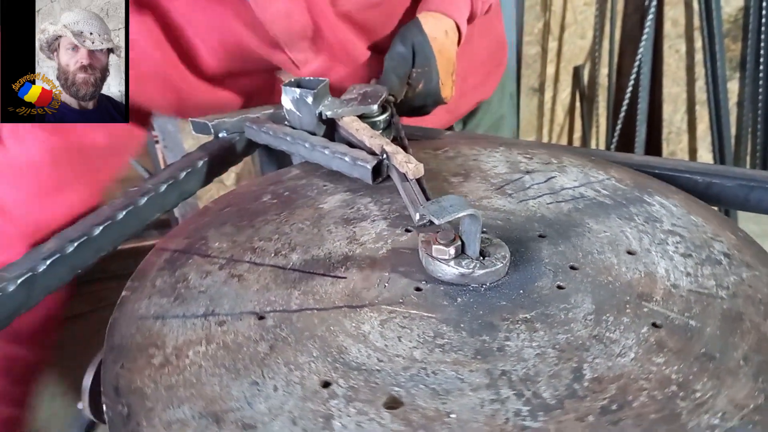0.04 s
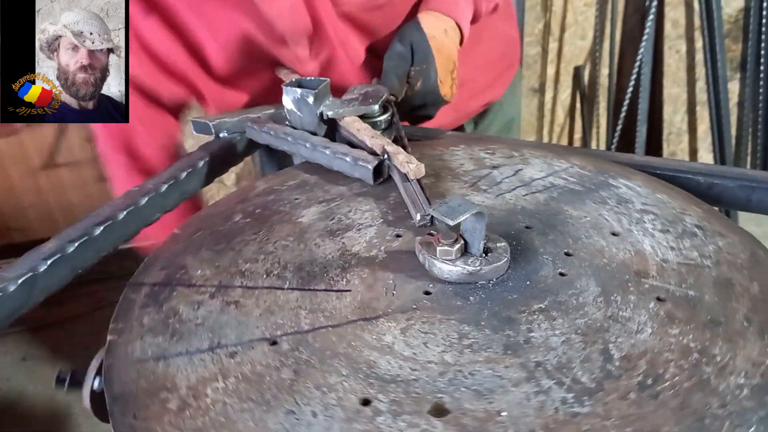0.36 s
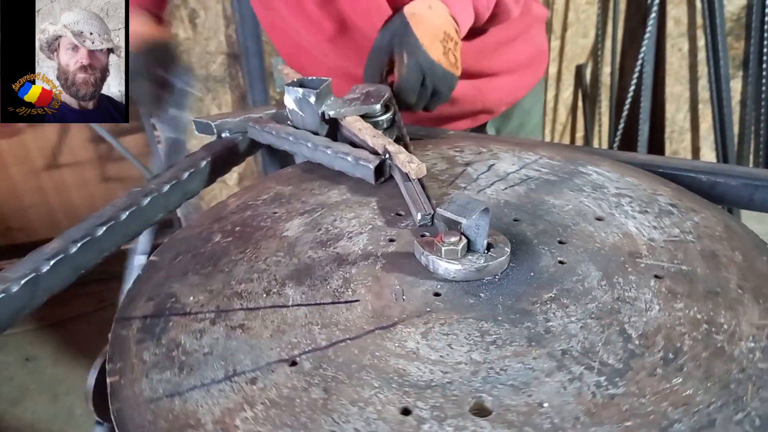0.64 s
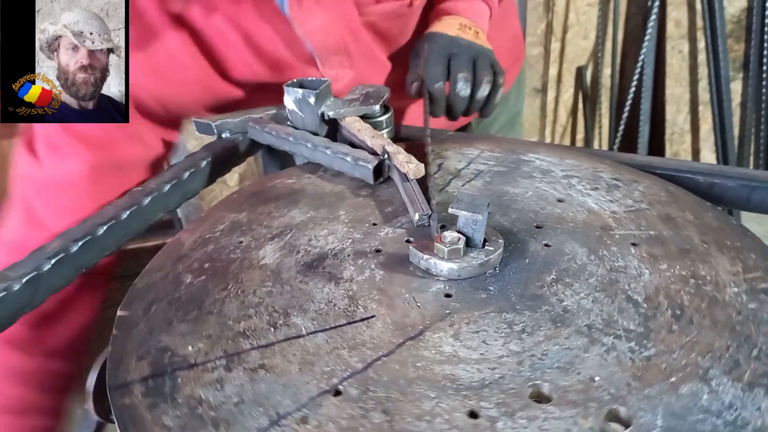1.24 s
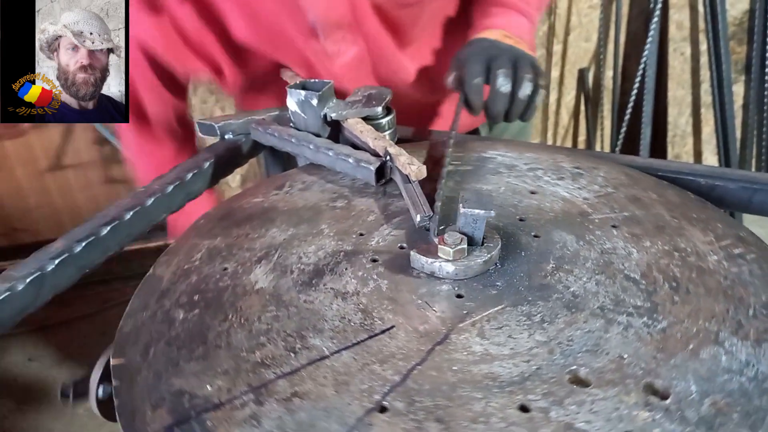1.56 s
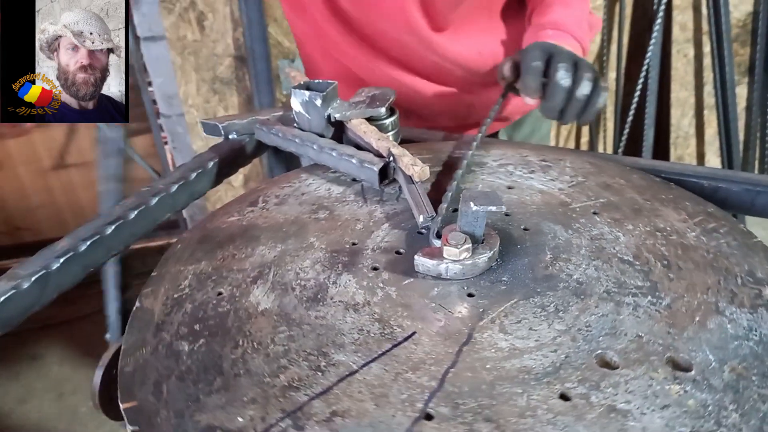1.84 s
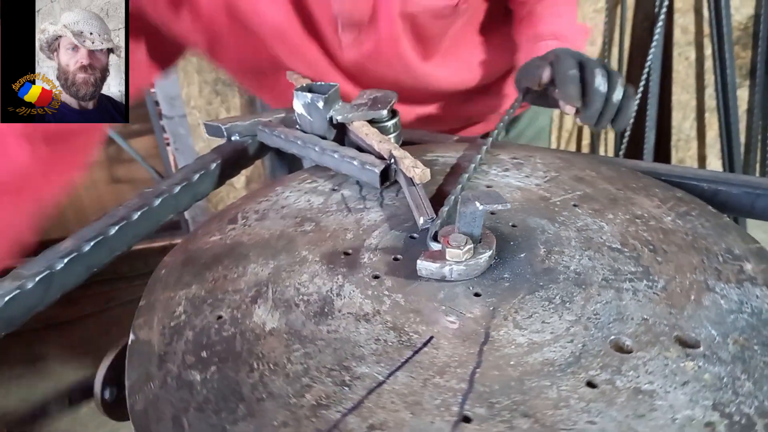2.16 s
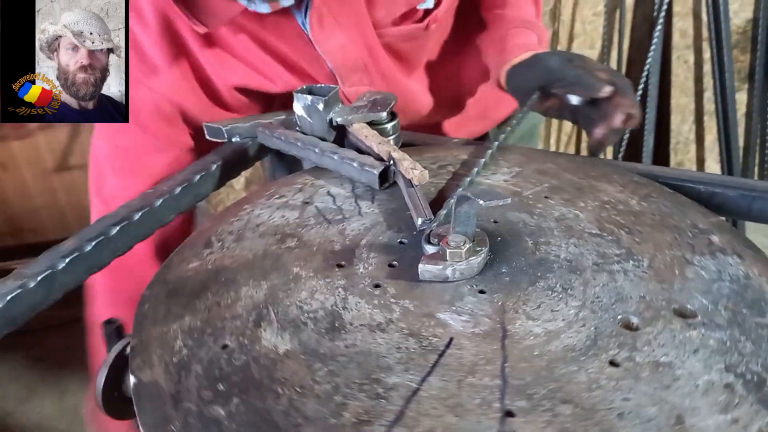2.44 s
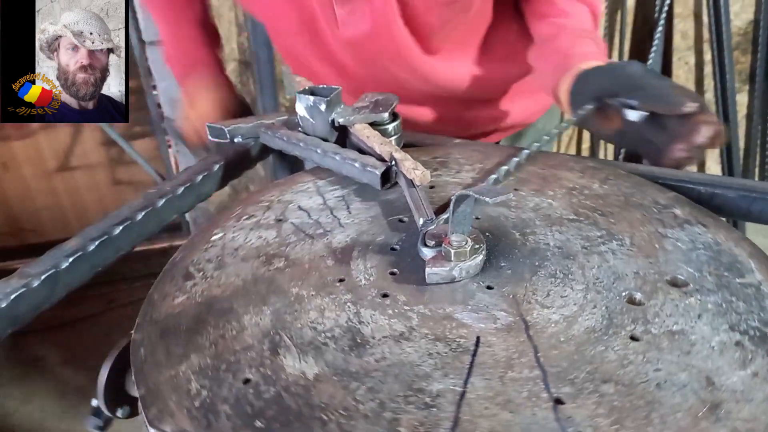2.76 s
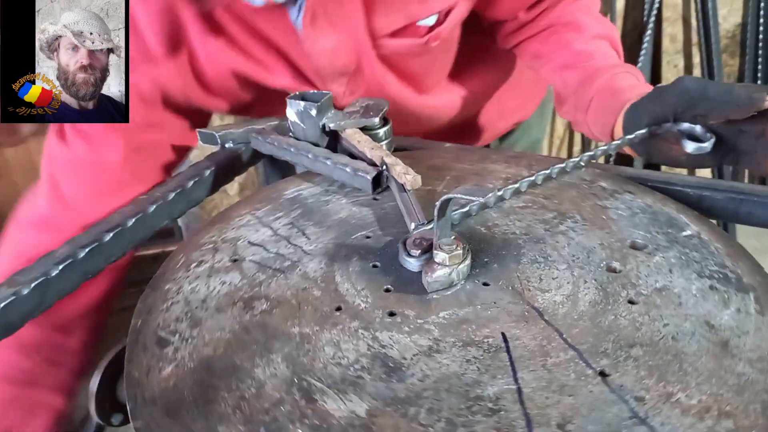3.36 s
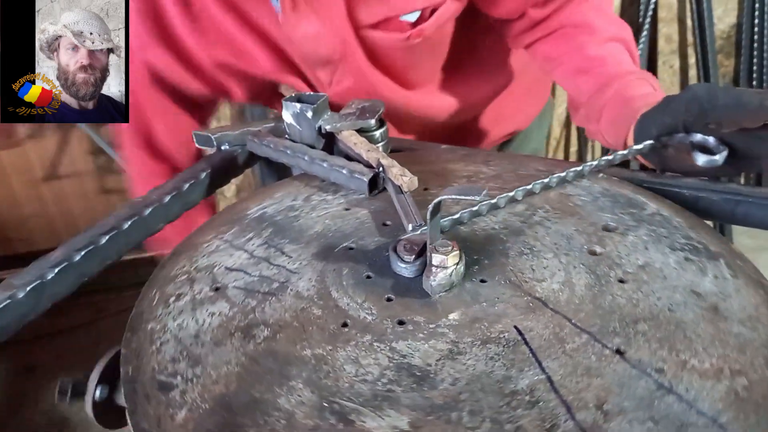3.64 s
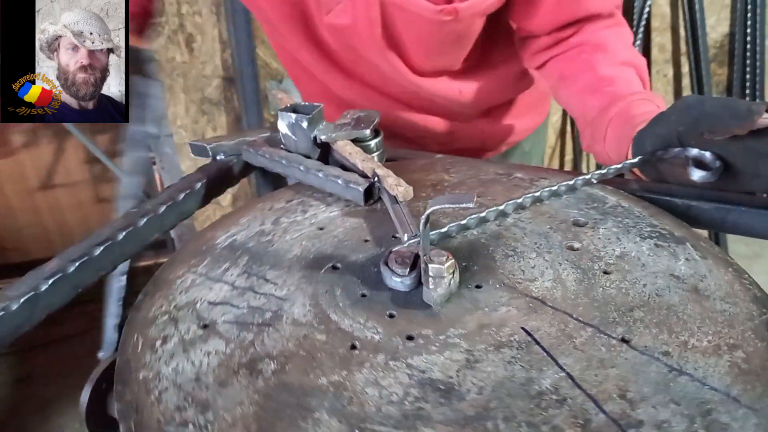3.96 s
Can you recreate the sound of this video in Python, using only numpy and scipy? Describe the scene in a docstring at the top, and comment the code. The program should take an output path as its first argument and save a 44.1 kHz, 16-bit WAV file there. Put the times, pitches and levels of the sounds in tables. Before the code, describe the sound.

Shrill metal squeaks and gritty creaks come in bursts from an iron bar being bent.

```python
"""In a small workshop, an iron bar is pulled round a bending jig on a steel table.
Stick-slip friction against the pin excites shrill squeaks, which break up into gritty crunches
as the bar gives. Between pulls, sliding and impacts ring the bar's modes in scrapes, squeals and
clinks, and once it snaps free with a ping. The table rumbles and resonates under soft bumps.
Two close microphones pick up the metal with reflections from the table and the room."""
import sys
import numpy as np
from scipy import signal
from scipy.fft import rfft, irfft
from scipy.io import wavfile
from scipy.ndimage import uniform_filter1d

SR = 44100
rng = np.random.default_rng(int(sys.argv[2]) if len(sys.argv) > 2 else 0)


def file_out(sig):
    """Save sig as 16-bit WAV at sys.argv[1]."""
    # one column per channel
    cols = np.atleast_2d(sig).T
    # limit, then scale
    lim = np.clip(cols, -1, 1)
    pcm = np.round(lim * 32767).astype(np.int16)
    wavfile.write(sys.argv[1], SR, pcm)


N = 4 * SR

# spectrum of sliding contact: (frequency [Hz], spectral level [dB])
SCRAPE_SPECTRUM = [(120, -33), (200, -11.5), (1250, -12), (2170, -2), (2420, -4.5), (4680, -10.5),
                   (5420, -13.5), (16000, -26)]
# normal modes of the bar: (frequency [Hz], level [dB], t60 [s])
BAR_MODES = [(1423, -17.5, 0.72), (2143, -3, 0.51), (2640, -17, 0.24), (3357, -8.5, 0.52),
             (4200, -21.5, 0.4), (4620, -14.5, 0.72), (6050, -14.5, 0.49), (7587, -5.5, 0.31)]
# spectrum of the shaken table and frame: (frequency [Hz], spectral level [dB])
RUMBLE_SPECTRUM = [(30, -44), (90, -9), (260, 3), (600, -3), (4000, -25)]
# spectrum of slips under load: (frequency [Hz], spectral level [dB])
CRUNCH_SPECTRUM = [(170, -42), (244, -19.5), (570, -29), (872, -21), (2000, -11.5), (2270, -4), (4770, -4),
                   (5420, -13.5), (6840, -1.5), (9020, -6), (10500, -12.5), (14100, -6.5)]


def amp(db):
    """Amplitude ratio of a level in decibels."""
    return 10 ** (np.asarray(db) / 20)


def unit(x):
    """Normalisation to rms 1."""
    return x / np.sqrt(np.mean(x ** 2) + 1e-20)


def read(points, hz):
    """Interpolation of a table on a log-frequency axis."""
    table_hz, value = np.transpose(points)
    return np.interp(np.log(hz + 1), np.log(table_hz + 1), value)


def add(mix, start, sound):
    """Superposition of a sound on the mix at a start time in seconds."""
    at = round(start * SR)
    sound = sound[max(-at, 0):]
    part = mix[max(at, 0):][:len(sound)]
    part += sound[:len(part)]


def colour(x, spectrum, tilt_db=0):
    """Zero-phase filtering by a spectrum table, with a tilt per octave above about 1 kHz."""
    hz = np.fft.rfftfreq(len(x), 1 / SR)
    gain = amp(read(spectrum, hz) + tilt_db * np.log2(1 + hz / 1000))
    return irfft(rfft(x) * gain, len(x))


def wobble(n, seconds):
    """Random fluctuation of rms 1 with the given correlation time."""
    return unit(uniform_filter1d(rng.standard_normal(n), max(1, round(seconds * SR))))


def resonate(x, hz, width_hz):
    """Forced response of one damped mode, with a peak gain near 1."""
    pole_radius = np.exp(-np.pi * width_hz / SR)
    pole = pole_radius * np.exp(2j * np.pi * hz / SR)
    return 2 * signal.lfilter([1 - pole_radius], [1, -pole], x).real


def envelope(t, rise, length, t60):
    """Quadratic attack, hold until `length`, then exponential decay."""
    return np.minimum(t / rise, 1) ** 2 * amp(-60 * np.maximum(t - length, 0) / t60)


def grit(n, spectrum, tilt_db=0, slips_per_s=5000, spread_db=4.0):
    """Shot noise: tiny slips of uneven size at random instants, filtered and scaled to rms 1."""
    size = amp(spread_db * np.minimum(rng.exponential(1, n), 4))
    slips = size * np.sign(rng.standard_normal(n)) * (rng.random(n) < slips_per_s / SR)
    return unit(colour(slips, spectrum, tilt_db))


def scrapes(ring_db=8.5):
    """Sliding friction: surface roughness makes noise that drives the modes of the bar."""
    # slides over the jig: (start [s], length [s], level [dB])
    slides = [(-.02, 0.026, -44), (1.57, 0.26, -43), (1.828, 0.22, -49.5), (2.56, 0.37, -55.5),
              (2.847, 0.11, -44), (3.399, 0.16, -49), (3.621, 0.028, -34.5), (3.668, 0.036, -37.5),
              (3.739, 0.33, -51)]
    rub, t = np.zeros(N), np.arange(SR) / SR
    for start, length, db in slides:
        waver_db = 1.5 * wobble(SR, seconds=0.02)
        shape = envelope(t, rise=0.016, length=length, t60=0.28) * amp(db + waver_db)
        add(rub, start, shape * grit(SR, SCRAPE_SPECTRUM))
    return rub + sum(amp(db + ring_db) * resonate(rub, hz, width_hz=5.1) for hz, db, _ in BAR_MODES)


def rumble(gain_db=-4, side_db=-13):
    """Structure-borne noise: handling shakes the table and frame, nearly alike in both channels."""
    # contour of the rumble: (time [s], relative level [dB])
    contour = [(0.108, -80), (2.5, -61), (3.7, -40), (3.951, -53.5)]
    mid = grit(N, RUMBLE_SPECTRUM)
    side = amp(side_db) * grit(N, RUMBLE_SPECTRUM)
    level = amp(gain_db + np.interp(np.arange(N) / SR, *np.transpose(contour)))
    return level * np.array([mid + side, mid - side])


def air(level_db=-68.5):
    """Stationary background noise, uncorrelated between the channels."""
    # (frequency [Hz], spectral level [dB])
    spectrum = [(24, -37.5), (256, -10), (965, -32), (2630, -23), (16000, -33.5)]
    return amp(level_db) * np.array([unit(colour(rng.standard_normal(N), spectrum)) for _ in range(2)])


def crunches():
    """Stress release: as the bar gives, the noise of tiny slips swells and decays exponentially."""
    # bursts of slips: (peak time [s], rise [s], t60 [s], level [dB], treble tilt [dB/octave])
    bursts = [(.16, 0.011, 0.31, -50, -8), (.725, 0.028, 0.56, -47.5, -3.5), (1.076, 0.032, 0.29, -25, 0),
              (1.12, 0.0066, 0.19, -19.5, -5), (1.9, 0.00076, 0.14, -19, -1),
              (2.208, 0.021, 0.098, -16.5, -1.5), (2.24, 0.046, 0.33, -32, -7.5),
              (2.934, 0.00036, 0.1, -26, -1), (3.18, 0.045, 0.76, -31, -6), (3.232, 0.017, 0.22, -20, -2)]
    out, t = np.zeros(N), np.arange(-SR // 4, SR // 2) / SR
    for peak, rise, t60, db, tilt_db in bursts:
        shape = np.exp(np.minimum(t, 0) / rise) * amp(db - 60 * np.maximum(t, 0) / t60)
        add(out, peak + t[0], shape * grit(len(t), CRUNCH_SPECTRUM, tilt_db))
    return out


def stick_slip(t, hz, roughness=1, sag_hz_per_s=405):
    """Phase of a relaxation oscillation whose uneven pitch starts sharp and sags as the bar slips."""
    sharpness = 0.02078 * np.exp(-t / 0.01132)
    jitter = roughness * 0.0276 * wobble(len(t), seconds=0.00051)
    pitch_hz = hz * (1 + sharpness + jitter) - sag_hz_per_s * t
    return 2 * np.pi * np.cumsum(pitch_hz) / SR


def squeaks(tone_db=-1.5, lower_mode_db=-15.5, rasp_db=-20.5, break_s=0.058, smear_rad=0.23):
    """Self-excited vibration: the bar chatters on the pin, breaking into a lower mode and grit."""
    # spells of chatter: (start [s], length [s], pitch [Hz], level [dB], overtone gain [dB], t60 [s])
    chatters = [(0.528, 0.043, 2874, -40, -20, 0.056), (0.598, 0.055, 2874, -36, -11, 0.12),
                (0.633, 0.081, 2862, -31.5, -10.5, 0.4), (.853, 0.056, 2866, -25, -4.5, 0.43),
                (0.993, 0.094, 2900, -21.5, -11, 0.24), (2.11, 0.064, 2852, -28, -12.5, 0.48),
                (2.961, 0.043, 3678, -12.5, -9.5, 0.23), (3.031, 0.036, 2855, -19, -3, 0.27),
                (3.268, 0.045, 2850, -21, -7.5, 0.074), (3.333, 0.039, 2883, -27.5, -5, 0.11),
                (3.849, 0.015, 2885, -34, -13, 0.49)]
    # second to fifth harmonic: (relative level [dB])
    harmonics = [-6, -9.5, -15, -10.5]
    out, t = np.zeros(N), np.arange(SR) / SR
    for start, length, hz, db, overtone_db, t60 in chatters:
        slip_s = np.minimum(t, length)  # the sag stops when the slip ends
        phase = stick_slip(slip_s, hz)
        lower_mode = np.sin(stick_slip(slip_s, 0.922 * hz, roughness=1.5))
        tone = np.sin(phase) + np.minimum(t / break_s, 1) * amp(lower_mode_db) * lower_mode
        # phase noise broadens each harmonic
        overtones = sum(amp(harmonic_db) * np.sin(k * phase + smear_rad * wobble(SR, seconds=0.00051))
                        for k, harmonic_db in enumerate(harmonics, start=2))
        rasp = amp(rasp_db) * grit(SR, CRUNCH_SPECTRUM)
        flutter = np.exp(0.26 * wobble(SR, seconds=0.0059))
        grip = envelope(t, rise=0.014, length=length, t60=t60) * flutter
        edge = amp(overtone_db) * grip ** 2.08 * (overtones + rasp)  # nonlinear: louder is brighter
        add(out, start, amp(db) * (amp(tone_db) * grip * tone + edge))
    return out


def screeches():
    """Rough stick-slip: strong frequency jitter makes a harsh, high tone just before the bar gives."""
    # high-pitched slips: (start [s], length [s], pitch [Hz], level [dB])
    slips = [(1.04, 0.021, 7040, -23.5), (2.123, 0.081, 7080, -34.5), (2.958, 0.03, 7350, -18),
             (3.19, 0.048, 7010, -30)]
    out, t = np.zeros(N), np.arange(SR) / SR
    for start, length, hz, db in slips:
        shape = amp(db) * envelope(t, rise=0.014, length=length, t60=0.16)
        add(out, start, shape * np.sin(stick_slip(t, hz, roughness=1.2)))
    return out


def clinks(click_t60=0.061, thud_hz=59, thud_width_hz=70):
    """Impact of iron on iron: a click, free vibration of the bar and a thud through the table."""
    # impacts: (time [s], click level [dB], ring level [dB], thud level [dB])
    impacts = [(1.119, -40.5, -52, -58), (1.9, -38.5, -46, -51), (2.208, -28, -38, -45.5),
               (2.968, -36.5, -57, -36), (3.23, -29, -29, -48), (3.616, -22, -28.5, -67),
               (3.685, -30, -38.5, -74)]
    out, t = np.zeros(N), np.arange(SR) / SR
    for start, click_db, ring_db, thud_db in impacts:
        click = unit(colour(rng.standard_normal(SR), SCRAPE_SPECTRUM))
        click *= amp(click_db - 60 * t / click_t60)
        ring = sum(amp(ring_db + db - 60 * t / t60) * np.sin(2 * np.pi * (hz * t + rng.random()))
                   for hz, db, t60 in BAR_MODES)
        low_noise = resonate(rng.standard_normal(SR), thud_hz, thud_width_hz)
        thud = unit(resonate(low_noise, thud_hz, thud_width_hz))
        thud *= amp(thud_db) * envelope(t, rise=0.025, length=0.013, t60=0.17)
        add(out, start, click + ring + thud)
    return out


def squeals():
    """Single-mode excitation: light rubbing swells one mode of the iron, which then decays freely."""
    # light rubs: (start [s], swell [s], pitch [Hz], level [dB], t60 [s])
    rubs = [(1.565, 0.01, 2150, -38, 0.24), (1.622, 0.02, 2155, -32.5, 0.13),
            (1.688, 0.022, 2146, -33, 0.27), (1.695, 0.019, 3030, -28.5, 0.21),
            (1.774, 0.013, 3008, -30, 1.04), (1.19, 0.029, 8608, -34, 0.2), (3.3, 0.051, 8630, -21, 0.17)]
    out, t = np.zeros(N), np.arange(SR) / SR
    for start, swell, hz, db, t60 in rubs:
        add(out, start, amp(db) * envelope(t, swell, swell, t60) * np.sin(2 * np.pi * hz * (t + start)))
    return out


def ping(start=1.9, hz=9010, hold_s=0.019, choke_t60=0.021, ring_t60=0.32, right_db=-21):
    """Two-stage decay: the bar snaps free with a ping on the left, soon damped to a thin ring."""
    out, t = np.zeros(N), np.arange(SR) / SR
    choked = amp(-12 - 60 * np.maximum(t - hold_s, 0) / choke_t60)
    lingering = amp(-24.5 - 60 * t / ring_t60)
    add(out, start, (choked + lingering) * np.sin(2 * np.pi * hz * t))
    return np.array([out, amp(right_db) * out])


def knocks():
    """Forced resonance: soft, rattling bumps drive the low modes of the table."""
    # bumps on the table: (time [s], level [dB])
    bumps = [(2.544, -55), (2.61, -51), (2.849, -54), (2.991, -38.5), (3.234, -45), (3.51, -43),
             (3.67, -53), (3.972, -40)]
    # low modes of the table: (frequency [Hz], gain [dB])
    table_modes = [(255, 12.5), (370, 12), (450, 10.5)]
    push, t = np.zeros(N), np.arange(SR) / SR
    shape = envelope(t, rise=0.013, length=0.013, t60=0.38)
    for start, db in bumps:
        add(push, start, amp(db) * shape * grit(SR, RUMBLE_SPECTRUM))
    return push + sum(amp(db) * resonate(push, hz, width_hz=6.7) for hz, db in table_modes)


def jig_ring(friction):
    """Sympathetic resonance: friction at the pin drives the high modes of the jig."""
    # modes of the jig: (frequency [Hz], bandwidth [Hz], gain [dB])
    jig_modes = [(8612, 8.8, 8.5), (8933, 70, 11), (2214, 27, 7), (2366, 23, 0.5), (2676, 46, 8.5)]
    return sum(amp(db) * resonate(friction, hz, width_hz) for hz, width_hz, db in jig_modes)


def echoes(x, table_db=1.5, table_t60=0.034, room_db=-9, build_s=0.016):
    """Reverberation: early reflections off the steel table, then the workshop's short diffuse tail."""
    # reverberation time of the workshop: (frequency [Hz], t60 [s])
    room_t60 = [(200, 0.47), (2500, 0.31), (8000, 0.25), (15000, 0.17)]
    hz, frame_s, spectra = signal.stft(rng.standard_normal(SR), SR, nperseg=256)
    decay = amp(-60 * frame_s / read(room_t60, hz)[:, None])
    t = np.arange(SR) / SR
    tail = signal.istft(spectra * decay, SR, nperseg=256)[1][:SR] * np.minimum(t / build_s, 1)
    early = rng.standard_normal(SR) * amp(-60 * t / table_t60)
    response = amp(room_db) * tail / np.linalg.norm(tail) + amp(table_db) * early / np.linalg.norm(early)
    return signal.fftconvolve(x, response)[:N]


def scene(right_lag_s=0.00011):
    """Superposition at two close microphones, which hear the metal with time and level differences."""
    # channel balance: (frequency [Hz], left minus right [dB])
    balance = [(300, -1.5), (1500, 0), (2800, -8.5), (4200, -1.5), (7300, -1), (9000, -0.5), (12000, 10.5),
               (14500, -0.5)]
    friction = squeaks() + screeches() + crunches()
    metal = friction + jig_ring(friction) + scrapes() + clinks()
    delayed = np.roll(metal, round(right_lag_s * SR))
    left = colour(metal + echoes(metal), [(hz, db / 2) for hz, db in balance])
    right = colour(delayed + echoes(metal), [(hz, -db / 2) for hz, db in balance])
    return np.array([left, right]) + air() + squeals() + ping() + knocks() + rumble()


def record(dry, cutoff_hz=15900):
    """Band limiting by a linear-phase low-pass filter."""
    taps = signal.firwin(255, cutoff_hz, window=("kaiser", 9), fs=SR)
    return signal.oaconvolve(dry, taps[None], "same")


dry = scene()
out = record(dry)
file_out(out)
```